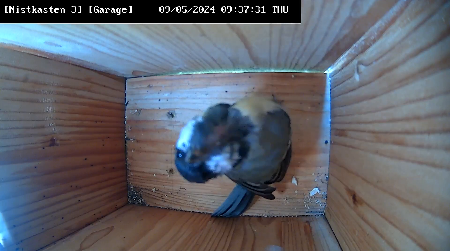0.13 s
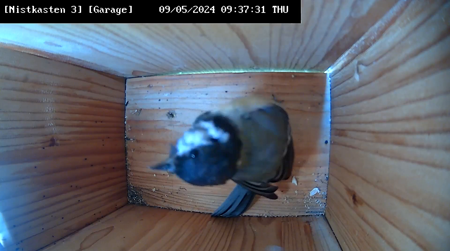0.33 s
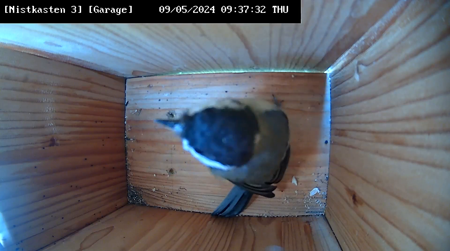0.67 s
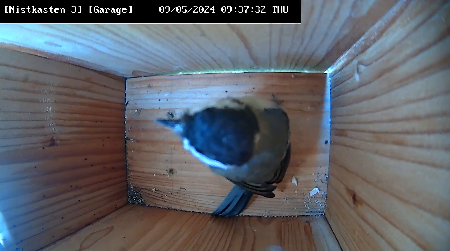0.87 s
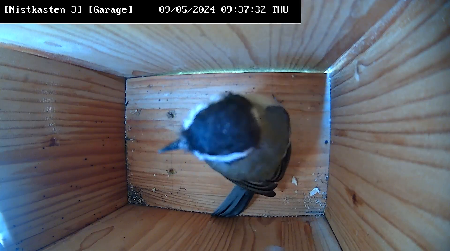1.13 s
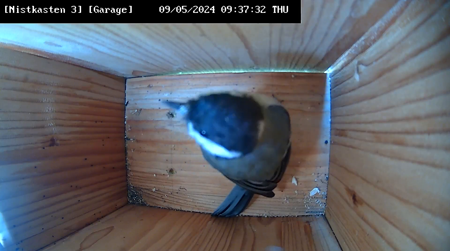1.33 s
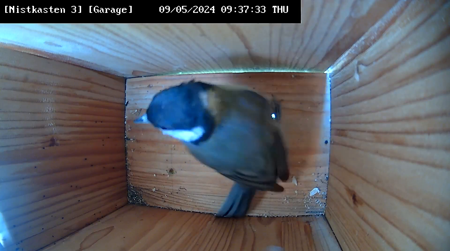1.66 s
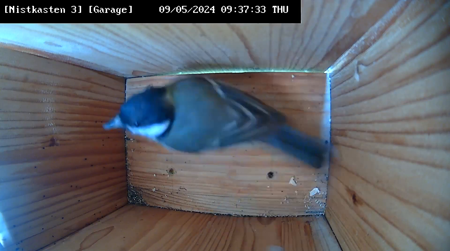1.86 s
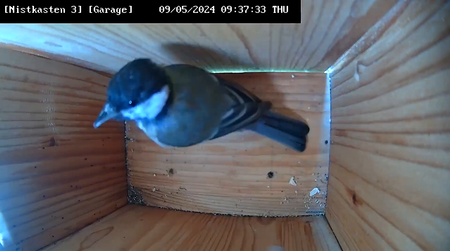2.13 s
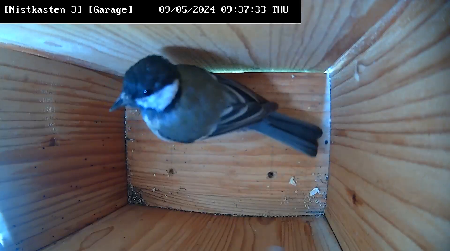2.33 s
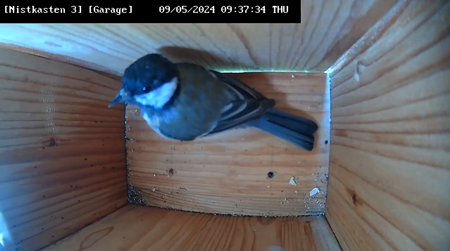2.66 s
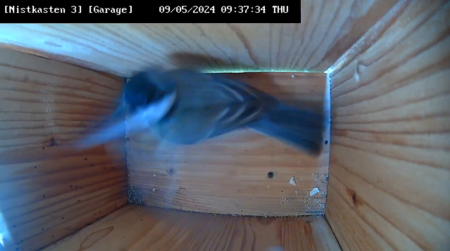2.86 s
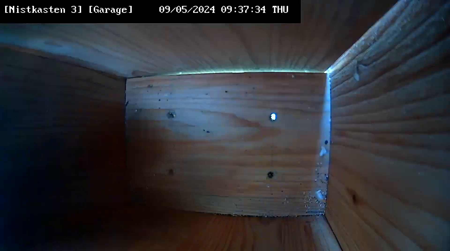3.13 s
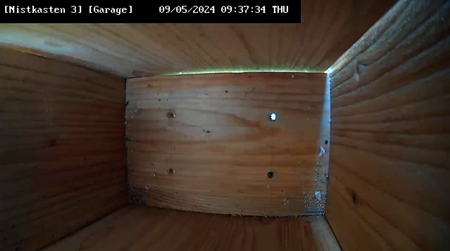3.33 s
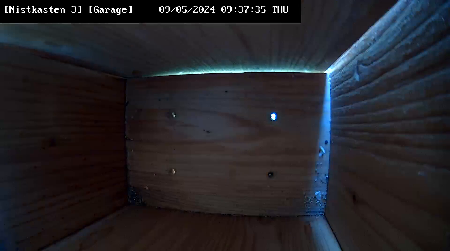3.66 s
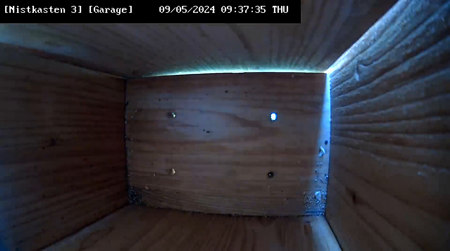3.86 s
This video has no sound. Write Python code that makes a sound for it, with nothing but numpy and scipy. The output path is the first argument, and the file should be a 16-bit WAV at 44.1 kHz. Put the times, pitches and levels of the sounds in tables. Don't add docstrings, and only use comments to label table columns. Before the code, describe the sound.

A small bird close to the microphone gives a quick run of harsh trilled churrs in a wooden box, then leaps with thumping wing gusts and claw scrabbling, over faint electrical ticking and low rumble.

```python
import sys
import numpy as np
from scipy import signal
from scipy.fft import rfft, irfft
from scipy.io import wavfile

SR = 44100
rng = np.random.default_rng(int(sys.argv[2]) if len(sys.argv) > 2 else 0)


def volts(x):
    e = np.asarray(x, float) / 20
    return 10 ** e


def dump(signal):
    limited = np.clip(np.atleast_2d(signal).T, -1, 1)
    pcm = np.round(limited * 32767).astype(np.int16)
    wavfile.write(sys.argv[1], SR, pcm)


N = 176400

# (time [s], level [dB])
DRAUGHT = [
    (0, -45.5),
    (.2, -37.5),
    (.8, -37),
    (0.951, -45),
    (1.9, -43),
    (2.301, -38),
    (2.899, -37),
    (3.499, -32.5),
    (3.7, -39),
    (4, -41),
]


def rms_one(x):
    return x / np.sqrt(np.mean(x ** 2) + 1e-20)


def butter(x, hz, kind, order=2):
    return signal.sosfilt(signal.butter(order, hz, kind, fs=SR, output="sos"), x)


def drift(hz):
    return rms_one(butter(rng.standard_normal(N + SR), hz, "low")[SR:])


def coloured(spectrum):
    hz, db = np.transpose(spectrum)
    f = np.maximum(np.arange(N // 2 + 1) * SR / N, 1)
    shape = volts(np.interp(np.log(f), np.log(hz), db))
    return rms_one(irfft(rfft(rng.standard_normal(N)) * shape, N))


def gate(t, start, end, rise, fall):
    return np.clip((t - start) / rise, 0, 1) * np.exp(-np.maximum(t - end, 0) / fall)


def phase(hz):
    return 2 * np.pi * np.cumsum(hz) / SR


def churrs(t):
    # (first beat [s], end [s], peak [dB], top pitch [Hz], swell [dB])
    calls = [
        (1.134, 1.29, -25, 7250, 22.5),
        (1.373, 1.498, -27.5, 7020, 8.5),
        (1.572, 1.692, -23.5, 7400, 12.5),
        (1.746, 1.838, -24, 7170, 9),
        (1.889, 1.969, -19, 7360, 4),
        (2.026, 2.118, -22, 7150, -0.5),
        (2.165, 2.273, -25.5, 7237, -3),
        (2.989, 3.117, -29.5, 7710, 5.5),
    ]
    # (lower voice [dB], fading middle voice [dB])
    side_voices = [
        (-2.5, -7.5),
        (-0.5, -1),
        (1, -12.5),
        (4.5, -27.5),
        (-4, -29.5),
        (-4, -17),
        (-5, -7.5),
        (-41, -15),
    ]
    trill_hz, trill_depth, beat_sharpness = 65.04, .9, 1.3
    merge_s = .045
    low_rest_hz, low_top_hz, low_jump_s = 3730, 4418, .05
    low_waver_hz, low_roughness, uneven_db = 70, .5, 1.8
    lead_s = 0.021
    out, clock = np.zeros(N), t
    chance = np.array([drift(150), drift(201.3), drift(350), drift(330), drift(30), drift(25), rasp_air()])
    for (start, end, peak_db, top_hz, swell_db), (low_db, middle_db) in zip(calls, side_voices):
        near = (clock > start - .1) & (clock < end + .2)
        t = clock[near]
        waver, waver_low, rough, rough_low, uneven, uneven_low, rasp = chance[:, near]
        left = np.clip(end - t, 0, end - start)
        db = peak_db - swell_db * left / (end - start)

        cycle = trill_hz * (t - start) + .06 * uneven
        apart = np.clip(.45 + .5 * left / merge_s, 0, 1)
        depth = trill_depth * apart

        def beat(lag):
            pulse = .5 - .5 * np.cos(2 * np.pi * (cycle - lag))
            return 1 - depth + depth * pulse ** beat_sharpness

        sweep = np.sin(2 * np.pi * cycle) * 270 * apart - 500 * np.clip(1 - left / 0.0052, 0, 1)
        climb = np.maximum(top_hz - 9600 * left, 6300)
        upper = phase(climb + sweep + 90 * waver)
        jump = (low_top_hz - low_rest_hz) * np.clip(1.4 - left / low_jump_s, 0, 1)
        lower = phase(low_rest_hz + jump + 0.4 * sweep + low_waver_hz * waver_low)

        difference = volts(-21) * np.sin(upper - lower)
        octave = volts(-11) * 2 * (1.2 - apart) * np.sin(2 * lower)
        upper_force = beat(0) * volts(uneven_db * uneven) * (1 + .35 * rough)
        lower_level = volts(-13 + low_db + uneven_db * uneven_low - 1.7 * (apart - 1.36))
        lower_force = lower_level * beat(0.38) * (1 + low_roughness * rough_low)
        tones = upper_force * (np.sin(upper) + difference + octave) + lower_force * np.sin(lower)
        out[near] += volts(db + 3.5) * gate(t, start - .01, end, 0.051, .003) * tones

        middle = np.sin(phase(5240 + sweep + 3 * low_waver_hz * uneven_low))
        middle_gate = gate(t, start, min(start + 0.065, end), 0.0033, 0.037)
        out[near] += volts(peak_db + middle_db) * middle_gate * beat(0) * (1 + low_roughness * rough) * middle

        pulsing = np.where(t < start, volts(-1), 1.33 + beat(0))
        air_gate = gate(t, start - lead_s, end, 0.0035, 0.024) * pulsing
        out[near] += volts(peak_db - 19.5 + 0.11 * (db - peak_db)) * air_gate * rasp
    return out


def rasp_air():
    # (frequency [Hz], density [dB per Hz])
    breath = [
        (530, -65.5),
        (900, -30),
        (1430, -19.5),
        (2400, -18.5),
        (3570, -6),
        (4410, -7.5),
        (6680, 0),
        (9000, -10),
        (11700, -56),
        (19800, -120),
    ]
    return lined(patchy(coloured(breath)))


def patchy(noise):
    patch_hz, patch_db = 260, 10
    spectrum = rfft(noise)
    band = (np.arange(N // 2 + 1) * SR / N / patch_hz).astype(int)
    return rms_one(sum(volts(patch_db * np.minimum(drift(5), .3)) * irfft(spectrum * (band == k), N)
                       for k in range(2, 36)))


def lined(x):
    # (frequency [Hz], width [Hz], level [dB])
    box_lines = [
        (1150, 120, 2.5),
        (1388, 90, 12),
        (1960, 46, 10.5),
        (2584, 37, 16.5),
        (2850, 24, 8),
        (3167, 41, 3.5),
        (3640, 69, 3.5),
        (4340, 110, 0),
        (5070, 90, 0.5),
        (5880, 110, 4),
    ]
    return rms_one(x + sum(volts(db) * signal.lfilter(*signal.iirpeak(hz, hz / width, SR), x)
                           for hz, width, db in box_lines))


def catches(t):
    # (start [s], from pitch [Hz], level [dB])
    chips = [
        (1.142, 6800, -48),
        (1.377, 7380, -34.5),
        (1.578, 7400, -24.5),
        (1.752, 7400, -29),
        (1.894, 8200, -26.5),
        (2.031, 7600, -42.5),
        (2.171, 7400, -29.5),
    ]
    chip_s, fall_hz_per_s = 0.0055, 420000
    out = np.zeros(N)
    for s, hz, db in chips:
        falling = np.sin(2 * np.pi * (hz - fall_hz_per_s / 2 * (t - s)) * (t - s))
        out += volts(db) * gate(t, s, s + chip_s, 0.0013, .0015) * falling
    return out


def box(x):
    t60_s, echo_db = .015, -10
    out = x.copy()
    for delay in (.0011, .0017, .0023, .0031):
        lag = int(delay * SR)
        feedback = np.r_[1, np.zeros(lag - 1), -volts(-60 * delay / t60_s)]
        out += volts(echo_db) * signal.lfilter(np.r_[np.zeros(lag), 1], feedback, x) / 2
    return out


def scrabble(t):
    # (time [s], level [dB])
    scrabbling = [(2.959, -70.5), (3.001, -39), (3.12, -52), (3.16, -32.5), (3.27, -36), (3.309, -48),
                  (3.35, -39.5), (3.39, -49), (3.5, -43), (3.58, -54.5), (3.721, -55)]
    # (time [s], peak [dB])
    knocks = [(3.1351, -12.5), (3.148, -12), (3.181, -33.5), (3.231, -30.5), (3.2497, -24), (3.2804, -52),
              (3.3486, -43), (3.4092, -34), (3.5306, -35), (3.5474, -30), (3.6136, -50), (3.6601, -22.5)]
    grains_per_s, knock_s = 1400, .0026
    clicks = (rng.random(N) < grains_per_s / SR) * rng.choice([-1, 1], N)
    grains = rms_one(clicks + .5 * rng.standard_normal(N))
    s, db = np.transpose(scrabbling)
    force = volts(np.interp(t, s, db, -120, -120) + 4.1 * drift(41))
    for s, db in knocks:
        force += volts(db - 7.5) * gate(t, s - .001, s + 0.0018, 1 / 1000, knock_s)
    return boards(force * grains + 1e-18) / np.std(boards(grains))


def boards(x):
    # (frequency [Hz], width [Hz], level [dB])
    modes = [
        (1395, 48, -7),
        (2020, 23, -22),
        (2860, 280, -11.5),
        (3340, 90, -6.5),
        (3733, 127, -0.5),
        (4150, 42, -5.5),
        (4870, 420, -7),
        (6000, 190, -13),
        (8100, 110, -31.5),
    ]
    widen = 1.3
    out = volts(-17.5) * butter(x, [900, 8500], "band")
    for k, (hz, width, db) in enumerate(modes):
        out += volts(db) * (-1) ** k * signal.lfilter(*signal.iirpeak(hz, hz / (widen * width), SR), x)
    return out


def wings(t):
    # (time [s], pressure [full scale], length [ms])
    strokes = [(2.955, 0.03, 3.7), (3.016, 0.8, 5.1), (3.028, -0.58, 6.8), (3.056, 0.22, 3),
               (3.083, .08, 3.2), (3.103, 0.24, 6), (3.138, 0.24, 2.6), (3.159, 0.28, 4),
               (3.168, 0.14, 1.58), (3.194, -0.66, 2.8), (3.21, 0.39, 6), (3.286, 0.21, 6.8),
               (3.438, -0.51, 3.72), (3.49, 0.014, 18), (3.539, 0.04, 5.6)]
    push = sum(p * np.exp(-.5 * ((t - s) * 1000 / ms) ** 2) for s, p, ms in strokes)
    return butter(push, 4, "high", order=1)


def booms(t):
    # (start [s], end [s], level [dB])
    swells = [
        (3.041, 3.077, -37),
        (3.184, 3.205, -28.5),
        (3.438, 3.469, -40),
    ]
    return np.sin(2 * np.pi * 242 * t) * sum(volts(db) * gate(t, a, b, 0.026, 0.0075) for a, b, db in swells)


def radio(t):
    # (time [s], length [ms])
    packets_early = [(0.044, 0.145), (0.0605, 0.09), (0.1104, 0.089), (0.1189, 0.307), (0.131, 0.176),
                     (0.2394, 0.214), (0.2522, 0.09), (0.3365, 0.292), (0.3429, 0.129), (0.3439, 0.176),
                     (0.4353, 0.194), (0.5282, 0.155), (0.5358, 0.184), (0.5483, 0.227), (0.6239, 0.17),
                     (0.7353, 0.402), (0.7389, 0.274), (0.7455, 0.21), (0.8826, 0.104), (0.8838, 0.251),
                     (0.9159, 0.162), (0.92, 0.427), (0.9221, 0.096), (0.9241, 0.293), (1.0684, 0.109),
                     (1.1273, 0.402), (1.1286, 0.136), (1.2674, 0.161), (1.2925, 0.102), (1.312, 0.129),
                     (1.3224, 0.374), (1.3268, 0.252), (1.4533, 0.205), (1.5291, 0.087), (1.5413, 0.11),
                     (1.5441, 0.414), (1.549, 0.299), (1.5527, 0.127), (1.6537, 0.119), (1.7183, 0.156),
                     (1.7204, 0.156), (1.935, 0.119), (2.13, 0.154), (2.1339, 0.093)]
    packets_late = [(2.1392, 0.313), (2.1432, 0.153), (2.2031, 0.094), (2.2266, 0.147), (2.3307, 0.146),
                    (2.3313, 0.185), (2.3432, 0.428), (2.3463, 0.121), (2.4845, 0.134), (2.485, 0.178),
                    (2.5206, 0.088), (2.5295, 0.204), (2.5371, 0.361), (2.5439, 0.157), (2.5539, 0.157),
                    (2.5669, 0.142), (2.571, 0.148), (2.5774, 0.202), (2.5837, 0.172), (2.5884, 0.208),
                    (2.6041, 0.136), (2.6417, 0.121), (2.6697, 0.128), (2.725, 0.108), (2.7674, 0.098),
                    (2.8637, 0.136), (2.938, 0.171), (2.958, 0.087), (3.3323, 0.187), (3.3369, 0.169),
                    (3.5389, 0.202), (3.5409, 0.1), (3.5431, 0.159), (3.6153, 0.124), (3.6343, 0.11),
                    (3.718, 0.091), (3.7218, 0.126), (3.7269, 0.148), (3.8239, 0.224), (3.9297, 0.183),
                    (3.9419, 0.167), (3.946, 0.271), (3.9491, 0.288), (3.9767, 0.088)]
    random_length = [.5427, 1.318, 1.7333, 1.94, 1.9452, 1.9466, 1.9488, 2.1362, 2.3397, 2.3413, 2.3447, 2.5466,
                     2.5564, 2.5983, 2.62, 2.7341, 2.7355, 2.754, 2.9321, 2.9336, 3.3451, 3.35, 3.551, 3.732,
                     3.7374, 3.739]
    poll_s, poll_jitter_s, poll_ms = .025, .002, 0.036
    polls = np.arange(0, t[-1], poll_s)
    polls = polls + poll_jitter_s * (.5 + rng.standard_normal(len(polls)))
    rows = [(s, rng.uniform(0.13, 0.52)) for s in random_length] + list(packets_early) + list(packets_late)
    rows += [(s, poll_ms) for s in polls]
    out = np.zeros(N)
    for s, ms in rows:
        near = slice(max(int(s * SR) - 40, 0), int(s * SR) + 40)
        out[near] += np.clip(ms * SR / 2000 + .5 - np.abs(t[near] - s) * SR, 0, 1)
    return volts(-32.5) * out


def rumble(t):
    # (frequency [Hz], density [dB per Hz])
    turbulence = [
        (8.8, -28),
        (15, 10),
        (41, -6),
        (77, -13),
        (141, -22),
        (350, -36),
        (460, -56.5),
        (770, -120),
    ]
    return volts(np.interp(t, *np.transpose(DRAUGHT))) * coloured(turbulence)


def gusts(t):
    # (start [s], end [s], level [dB])
    blows = [
        (0.182, 0.793, -48),
        (2.163, 2.97, -47),
        (3.061, 3.542, -46),
    ]
    buffets_per_s, rise_hz, fall_hz = 100, 300, 35.7
    count = np.floor(np.cumsum(buffets_per_s * volts(3.5 * drift(40))) / SR)
    kicks = np.diff(count, prepend=0) * rng.uniform(0.067, 1, N)
    buffet = butter(butter(kicks, fall_hz, "low", order=1), rise_hz, "low")
    buffet = rms_one(butter(buffet, 45, "high", order=1))
    return buffet * sum(volts(db) * gate(t, a, b, 0.041, 0.0077) for a, b, db in blows)


def hiss(t):
    swing_db = np.interp(t, *np.transpose(DRAUGHT)) + 41
    level = volts(-65.5 + 0.2 * np.minimum(swing_db, 3.0) + 4.7 * drift(19))
    return level * rms_one(butter(rng.standard_normal(N), [476, 6000], "band", order=1))


def far_whistles(t):
    # (start [s], end [s], from [Hz], to [Hz], level [dB])
    whistles = [
        (2.762, 2.815, 3100, 3600, -67),
        (2.824, 2.853, 3820, 4200, -64),
        (2.86, 2.92, 3760, 3780, -67),
        (3.935, 4, 3780, 3781, -63),
    ]
    out = np.zeros(N)
    for a, b, from_hz, to_hz, db in whistles:
        glide = np.interp(t, [a, b], [from_hz, to_hz])
        out += volts(db) * gate(t, a, b, 0.0046, .006) * np.sin(phase(glide))
    return out


def housing(x):
    for hz in (2400, 5280):
        x = x - 0.73 * signal.lfilter(*signal.iirpeak(hz, 2.9, SR), x)
    return x


def scene():
    t = np.arange(N) / SR
    bird = box(churrs(t) + catches(t))
    port = wings(t) + booms(t) + rumble(t) + gusts(t)
    return (housing(bird + scrabble(t)) + port + radio(t) + hiss(t) + far_whistles(t))[None]


def band_dropouts(x):
    # (start [s], end [s], low [Hz], high [Hz])
    dropouts = [(.12, .19, 7500, 9500), (.19, .288, 3600, 9500), (.288, .36, 5600, 9500),
                (.36, .42, 7000, 9500), (.585, .608, 5600, 9500), (1.29, 1.33, 5800, 6400),
                (1.29, 1.33, 7900, 8200), (1.344, 1.352, 1800, 9500), (1.6, 1.7, 5250, 5450),
                (1.8, 1.89, 350, 1100), (1.8, 2.14, 4980, 5150), (1.9, 2.1, 5500, 5650),
                (1.995, 2.085, 350, 1100), (2.17, 2.3, 3250, 3420), (2.25, 2.3, 5200, 6000),
                (2.38, 2.415, 4000, 9500), (3.02, 3.122, 330, 1050), (3.0, 3.122, 2100, 2600),
                (3.0, 3.122, 1550, 1850), (3.085, 3.122, 1050, 1550), (3.085, 3.122, 1850, 2100),
                (3.0, 3.08, 3500, 3800), (3.0, 3.12, 5200, 5550), (3.08, 3.12, 6100, 6900),
                (3.19, 3.24, 2200, 2600), (3.2, 3.24, 330, 1050), (3.27, 3.57, 5150, 5550),
                (3.4, 3.49, 330, 1100), (3.4, 3.495, 1600, 2800), (3.4, 3.495, 4200, 5150),
                (3.4, 3.49, 6200, 9500), (3.4, 3.425, 5550, 6200)]
    t, f, spectrum = np.arange(N) / SR, np.arange(N // 2 + 1) * SR / N, rfft(x)
    return x - sum(gate(t, a, b, .006, .003) * irfft(spectrum * ((f > low) & (f < high)), N)
                   for a, b, low, high in dropouts)


def band_limit(x):
    return signal.sosfilt(signal.butter(12, 9230, fs=SR, output="sos"), x)


def record(dry):
    cutoff_hz = 9450
    soft = butter(band_dropouts(dry), 6290, "low")
    steep = signal.cheby2(10, 60, cutoff_hz + 700, fs=SR, output="sos")
    return band_limit(signal.sosfiltfilt(steep, soft))


dry = scene()
out = record(dry)
dump(out)
```